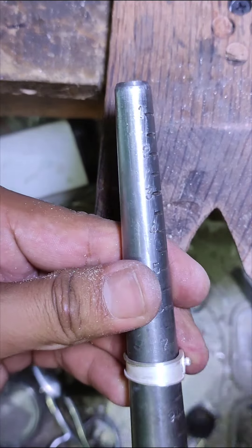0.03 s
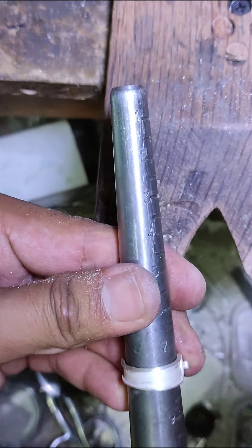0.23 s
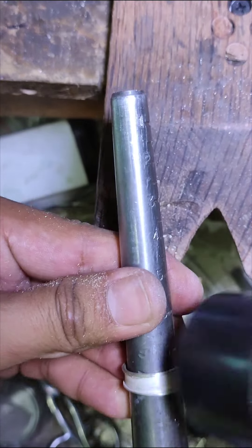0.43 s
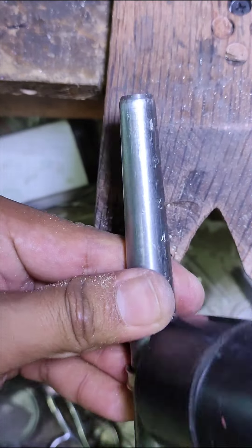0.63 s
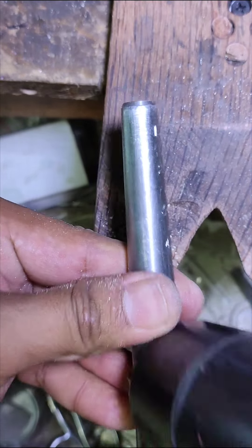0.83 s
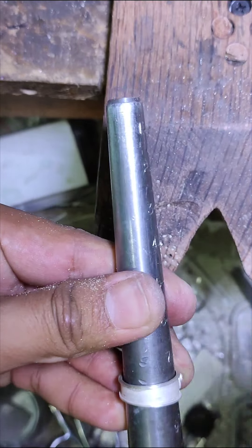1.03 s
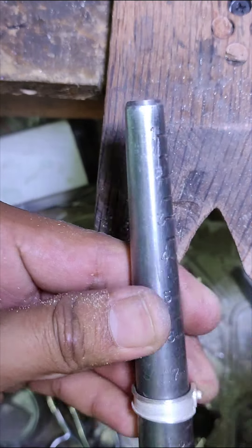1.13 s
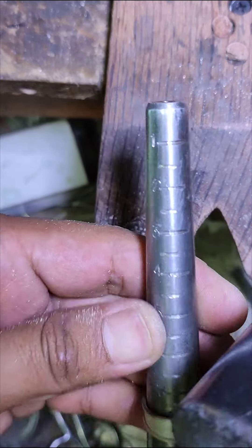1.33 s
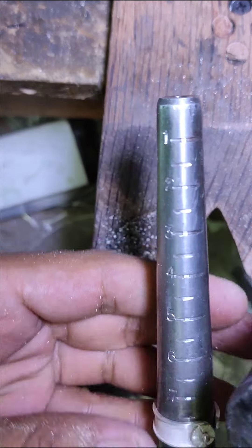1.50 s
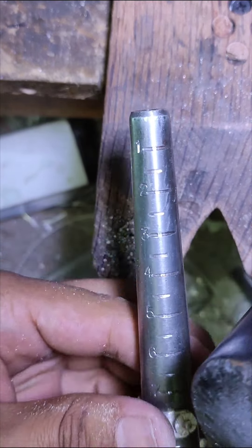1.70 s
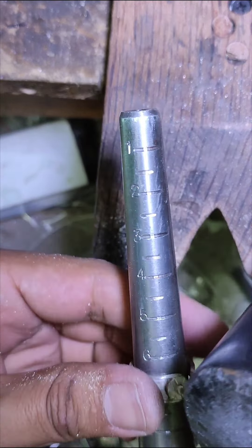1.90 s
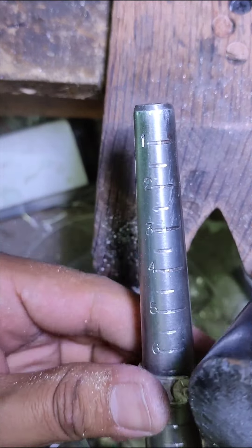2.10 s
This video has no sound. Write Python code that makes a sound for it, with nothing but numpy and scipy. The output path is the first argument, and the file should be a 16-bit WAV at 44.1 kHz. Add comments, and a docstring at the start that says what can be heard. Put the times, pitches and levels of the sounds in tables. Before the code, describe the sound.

Four quick, even mallet blows clink against a ring on a hand-held steel mandrel, close to the microphone in a small workshop. Afterwards come soft finger rubbing, light ticks and a tiny scrape over a very faint hum.

```python
"""Tapping a ring on a mandrel

A mallet taps a metal ring four times on a hand-held steel mandrel, close up. Each blow cracks,
knocks the wooden bench peg and rings the rod's bending modes, which the fingers damp. Then fingers
slide down the steel and the ring ticks and scrapes as it is turned, over a faint workshop hum."""
import sys
import numpy as np
from scipy import signal
from scipy.fft import rfft, irfft
from scipy.io import wavfile
from scipy.ndimage import uniform_filter1d

SR = 44100
rng = np.random.default_rng(int(sys.argv[2]) if len(sys.argv) > 2 else 0)


def put_to_file(sound):
    """Save the sound as 16-bit audio at rate SR, in the file named by the first command-line argument."""
    columns = np.atleast_2d(sound).T  # one column per channel
    safe = np.clip(columns, -1, 1)
    whole_steps = np.round(safe * 32767)
    wavfile.write(sys.argv[1], SR, whole_steps.astype(np.int16))


N = 94815

# tone colour of the ring rubbing on steel: freq_hz, level_db
SCRAPE_EQ = [(500, -27), (2000, 0.5), (3200, 0), (5500, 3), (7500, 3.3), (10000, -2), (12700, 1.5),
             (14200, 5), (15500, -34)]
# bending modes of the loosely held rod: pitch_hz
LOOSE_ROD_HZ = [3088, 5698, 8934, 12742]

ROD_RISE_S, SOFT_TOP_HZ = 0.00061, 14300
SCRAPE_GRAIN, SCRAPE_RIGHT_DB = 0.21, 2.5


def amp(db):
    """Decibels to gain."""
    return 10 ** (np.asarray(db) / 20)


def unit(x):
    """Scales to rms 1."""
    return x / np.sqrt(np.mean(x ** 2) + 1e-20)


def curve_at(points, hz):
    """Reads a curve on a log-frequency axis."""
    freqs, values = np.transpose(points)
    return np.interp(np.log(hz + 1), np.log(freqs), values)


def pan(right_db):
    """Left and right gains, right_db apart."""
    return amp(np.array([[-right_db], [right_db]]) / 2)


def colour(x, eq, tilt_db=0):
    """EQ curve plus a tilt per octave above 1 kHz, keeping the power of white noise."""
    hz = np.fft.rfftfreq(N, 1 / SR)
    gain_db = curve_at(eq, hz) + tilt_db * np.log2(np.maximum(hz, 1000))
    return irfft(rfft(x) * unit(amp(gain_db)), N)


def lowpass(x, hz):
    """Steep treble cut."""
    kernel = signal.firwin(255, hz, window=("kaiser", 8), fs=SR)
    return signal.oaconvolve(x, kernel[None], "same")


def strike(t, rise_s, fall_s):
    """Envelope that swells to 1 at t = 0 and dies away."""
    return np.exp(np.minimum(t / rise_s, -t / fall_s))


def mode(t, hz, t60_s, rise_s, phase=0):
    """One decaying vibration."""
    return strike(t, rise_s, t60_s / np.log(1000)) * np.cos(2 * np.pi * hz * t + phase)


def fader(points):
    """Gain along a curve of (time_s, level_db), silent outside it."""
    return amp(np.interp(np.arange(N) / SR, *np.transpose(points), left=-200, right=-200))


def flutter(hz):
    """Random wobble, mostly slower than hz."""
    rolloff = np.exp(-np.fft.rfftfreq(N, 1 / SR) / hz)
    return unit(irfft(rfft(rng.standard_normal(N)) * rolloff, N))


def correlate(pair, likeness):
    """Blends two independent noises into a partly alike stereo pair."""
    left, other = pair
    return np.array([left, likeness * left + np.sqrt(1 - likeness ** 2) * other])


def friction(grain):
    """Noise that comes in small clumps, as surfaces catch and slip."""
    clumps = unit(uniform_filter1d(rng.standard_normal(N), size=60))
    return unit(rng.standard_normal((2, N)) * np.exp(grain * clumps))


def workshop():
    """Steady room tone with a few faint, wavering hums."""
    # colour of the room tone: freq_hz, level_db
    air_eq = [(15, -27), (25, 4.5), (114, -5.5), (338, -9.5), (386, -6.5), (452, -14.5), (517, -7.5),
              (639, -15.5), (1210, -19), (5800, -30), (9350, -38), (11600, -34.5), (14300, -40.5)]
    # likeness of left and right: freq_hz, correlation
    likeness = [(60, 0), (300, 0.5), (640, 0), (1400, 0)]
    # hum tones: pitch_hz, rms_db
    hums = [(166.9, -78.5), (242.2, -83), (269.2, -84.5), (393.0, -78.5), (511.4, -81.5)]
    hz, t = np.fft.rfftfreq(N, 1 / SR), np.arange(N) / SR
    spectrum = correlate(rfft(rng.standard_normal((2, N))), curve_at(likeness, hz))
    air = unit(colour(irfft(spectrum, N), air_eq))
    hum = sum(amp(db) * np.sqrt(2) * np.sin(2 * np.pi * pitch_hz * t + 0.33 * flutter(5))
              for pitch_hz, db in hums)
    return amp(-64) * air + hum


def crack(t, tilt_db):
    """Metal on metal: a click, a dense burst and the ring's brief chatter, thrown back by the bench."""
    # colour of the crack: freq_hz, level_db
    crack_eq = [(300, -14), (1400, -5), (2000, -2), (2700, 1.5), (4000, -1), (5200, 2), (6600, 2),
                (8200, -6.5), (9800, -7.5), (11500, 2), (13600, 0), (14300, -5), (15500, -26)]
    # reflections off the bench: delay_s, gain
    bench = [(.0022, .3), (.0056, 0.08)]
    rise_s, click_s, chatter_t60_s, smoothing_hz = 0.00017, 0.000087, 0.075, 1500
    envelope = strike(t, rise_s, fall_s=0.0018)
    spectrum = rfft(correlate(rng.standard_normal((2, N)), likeness=0.077) * envelope)
    # flatten the burst's chance peaks so the EQ sets its tone
    power = uniform_filter1d(abs(spectrum) ** 2, size=smoothing_hz * N // SR)
    burst = irfft(spectrum / np.sqrt(abs(power) + 1e-12), N) * np.linalg.norm(envelope)
    chatter = lowpass(rng.standard_normal((2, N)), SOFT_TOP_HZ)
    chatter *= strike(t, rise_s, chatter_t60_s / np.log(1000))
    contact = colour(amp(-18.5) * burst + amp(-38) * chatter, crack_eq, tilt_db) * pan(2.5)
    contact += amp(-32.5) * strike(t, click_s, click_s)
    return contact + sum(gain * np.roll(contact, round(delay_s * SR), 1) for delay_s, gain in bench)


def knock(t, pitch_ratio, strength_db):
    """Dull thud of mallet head and wooden peg, brighter when hit harder."""
    # modes of the peg and mallet head: pitch_hz, level_db, t60_s
    wood = [(60, -49.5, .08), (202, -45, 0.024), (308.8, -36, .027), (360.5, -28.5, .029), (530, -29, .021),
            (874.4, -26, 0.031), (922, -30, .016), (1304, -28, 0.0098), (1565, -35, 0.02),
            (1800, -50, .016)]
    tilt_db, pivot_hz = 0.25 * strength_db, 530
    thud = np.zeros(N)
    for hz, db, t60_s in wood:
        gain = amp(db + strength_db + tilt_db * np.log2(hz / pivot_hz))
        thud += gain * mode(t, hz * pitch_ratio, t60_s, rise_s=0.0009)
    return thud * pan(-3.34)


def struck_rod(t, tilt_db, lowest_db, cents):
    """The lowest mode swells as two planes beat; the loose ring rattles the rest, the grip chokes them."""
    # bending modes of the mandrel: pitch_hz
    modes_hz = [1205, 3080, 5694, 8936, 12742]
    # voicing of those modes: left_db, right_db, t60_s, right_lag_rad
    voicing = [(-41, -39, 0.41, 1.93), (-27, -23.5, 0.088, 0.92), (-42.5, -38, 0.17, 2.7),
               (-33.5, -33, .06, 1.7), (-32, -28, 0.14, 3)]
    twin_split_hz, grip_s = 7, 0.06
    rattle = 1 + 0.22 * np.array([flutter(70), flutter(70)])
    ringing = np.zeros((2, N))
    for k, (hz, (left_db, right_db, t60_s, lag_rad)) in enumerate(zip(modes_hz, voicing)):
        hz = hz * 2 ** (cents / 1200)
        phase = np.array([[0], [-lag_rad]])
        tone = mode(t, hz, t60_s, ROD_RISE_S, phase)
        if k == 0:
            # the second bending plane is slightly sharper and more damped by the fingers
            twin = mode(t, hz + twin_split_hz, t60_s / 3, ROD_RISE_S, phase)
            tone = amp(lowest_db) * (tone - 0.65 * twin)
        else:
            tone = tone * rattle * np.exp(-(t / grip_s) ** 2)
        stereo_db = np.array([[left_db], [right_db]]) + tilt_db * np.log2(hz / modes_hz[1])
        ringing += amp(stereo_db) * tone
    return ringing


def mallet_taps():
    """Four blows as two stems: the cracks with their wooden knocks, and the ringing rod."""
    # mallet blows: start_s, crack_db, crack_tilt_db_per_octave, knock_db, knock_pitch_ratio,
    # rod_db, rod_tilt_db_per_octave, lowest_mode_db, rod_detune_cents, right_minus_left_db
    blows = [(0.2411, -4.5, 0.1, -8, 1.074, -1, -2.7, -7, -6, 0.5),
             (0.4954, 0.4, -0.2, -5, 1.012, -5, 2.3, 5, -1, -3.8),
             (.7335, 0.3, 1, -2.95, 1.001, -1.4, 0.1, -3, 1.4, 0),
             (.9597, -2.66, -1.55, -0.9, 1.007, -3, 4.66, 10.5, 1, -1)]
    hits, ringing = np.zeros((2, 2, N))
    for (start_s, crack_db, crack_tilt, knock_db, knock_ratio,
         rod_db, rod_tilt, lowest_db, cents, right_db) in blows:
        t = np.arange(N) / SR - start_s
        hits += amp(crack_db) * crack(t, crack_tilt) * pan(right_db)
        hits += knock(t, knock_ratio, knock_db)
        ringing += amp(rod_db) * struck_rod(t, rod_tilt, lowest_db, cents) * pan(right_db)
    return hits, ringing


def room(send):
    """Short diffuse tail of a small, cluttered room."""
    # reverb bands: freq_hz, level_db, t60_s
    bands = [(100, -20, .2), (400, -12.5, 0.31), (1030, -16, 0.16), (2500, -14.5, .2), (6030, -12, 0.17),
             (13000, -15.5, .16)]
    bands = np.array(bands)
    hz, t, noise = signal.stft(rng.standard_normal((2, SR // 2)), SR, nperseg=256)
    db = curve_at(bands[:, [0, 1]], hz)[:, None]
    t60_s = curve_at(bands[:, [0, 2]], hz)[:, None]
    decay = amp(db - 60 * t / t60_s) * np.sqrt(2 * np.log(1000) / (t60_s * SR))
    tail = signal.istft(noise * decay, SR, nperseg=256)[1]
    tail *= np.minimum(np.arange(tail.shape[1]) / SR / 0.002, 1)  # 2 ms fade-in
    return signal.fftconvolve(send, tail, axes=1)[:, :N]


def finger_slide():
    """Fingers slide down the steel with a grainy hiss that faintly rings it."""
    # swell of the slide: time_s, level_db
    swell = [(1.05, -80), (1.23, -81.5), (1.28, -73), (1.33, -74), (1.38, -67.5), (1.47, -70),
             (1.54, -75.5), (1.6, -69.5), (1.66, -88)]
    # colour of skin on steel: freq_hz, level_db
    skin_eq = [(800, -25), (2200, -1), (3200, 4), (4500, -4), (7000, 3), (9000, -13.5), (13000, -4.5),
               (14300, -4), (15500, -39)]
    rub = colour(friction(grain=0.26), skin_eq) * fader(swell)
    return (rub + amp(-15) * rubbed_rod(rub[0])) * pan(5.5)


def rubbed_rod(force):
    """Rubbing sets the loosely held rod ringing."""
    # voicing of the loose rod's modes: level_db, t60_s
    voicing = [(-3, 0.12), (-9.5, 0.079), (-25, .06), (-10, 0.048)]
    t = np.arange(SR // 2) / SR
    ringing = np.zeros(N)
    for hz, (db, t60_s) in zip(LOOSE_ROD_HZ, voicing):
        response = signal.fftconvolve(force, mode(t, hz, t60_s, ROD_RISE_S))[:N]
        ringing += amp(db) * unit(response)
    return np.std(force) * ringing


def ring_ticks():
    """Light, gritty touches of the ring, each stirring the rod."""
    # touches: peak_s, level_db, tilt_db_per_octave, decay_s, rod_db
    touches = [(1.147, -60, -5.5, 0.0052, -20), (1.559, -58, 1, 0.01, -5), (1.825, -74, -7, .012, 2),
               (1.924, -64.5, -6.5, 0.0049, -3.5), (1.979, -70, 3, 0.0057, -7),
               (2.014, -60.5, -5, 0.0071, 0)]
    t = np.arange(N) / SR
    ticks = np.zeros((2, N))
    for peak_s, db, tilt_db, decay_s, rod_db in touches:
        grit = colour(friction(SCRAPE_GRAIN), SCRAPE_EQ, tilt_db)
        touch = amp(db) * grit * strike(t - peak_s, rise_s=0.0025, fall_s=decay_s)
        ticks += touch + amp(rod_db) * rubbed_rod(touch[0])
    return ticks * pan(SCRAPE_RIGHT_DB)


def ring_scrape():
    """The ring scrapes as it is turned, and the rod rings along."""
    # swell of the scrape: time_s, level_db
    swell = [(1.91, -94.5), (1.925, -72.5), (1.948, -74), (1.965, -68), (1.985, -59), (2.018, -71.5),
             (2.035, -85), (2.08, -82), (2.13, -92)]
    rub = colour(friction(SCRAPE_GRAIN), SCRAPE_EQ) * fader(swell)
    return (rub + rubbed_rod(rub[0]) * pan(7.5)) * pan(SCRAPE_RIGHT_DB)


def singing_rod():
    """As the grip shifts, one mode of the rod is left free and sings softly."""
    peak_s = 1.975
    t = np.arange(N) / SR - peak_s
    return amp(-56.5) * mode(t, LOOSE_ROD_HZ[1], t60_s=0.3, rise_s=0.012) * pan(9)


def scene():
    """Blows up close; handling, room tail and hum behind them."""
    hits, ringing = mallet_taps()
    ringing += singing_rod()
    handling = finger_slide() + ring_scrape() + ring_ticks()
    tail = room(hits + handling + amp(-6) * ringing)  # the thin rod sends little into the room
    return hits + ringing + lowpass(handling + tail + workshop(), SOFT_TOP_HZ)


def record(dry):
    """Trims the very top of the treble."""
    return lowpass(dry, hz=16400)


dry = scene()
out = record(dry)
put_to_file(out)
```